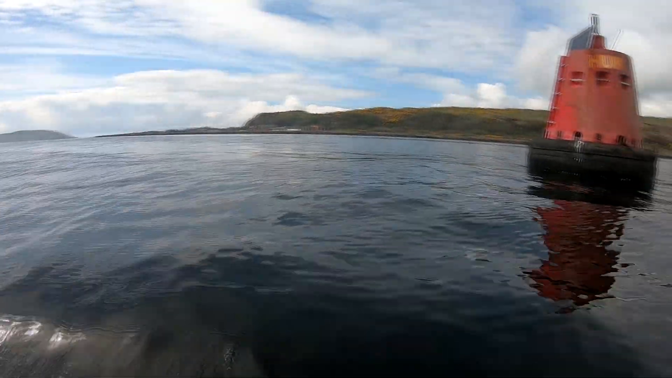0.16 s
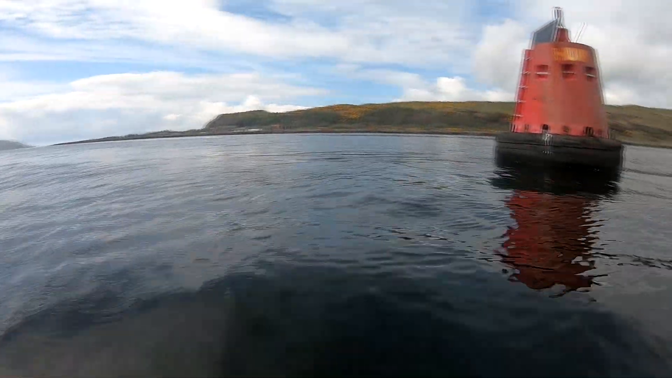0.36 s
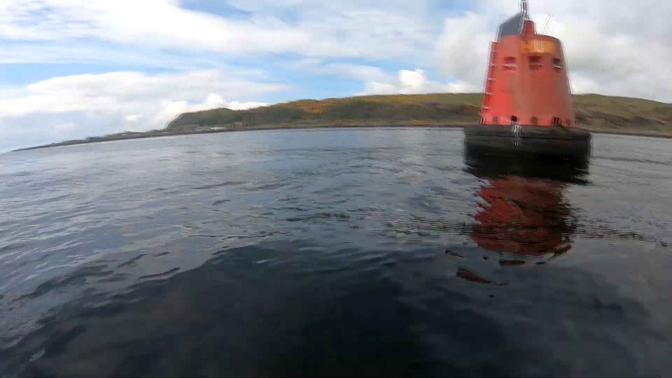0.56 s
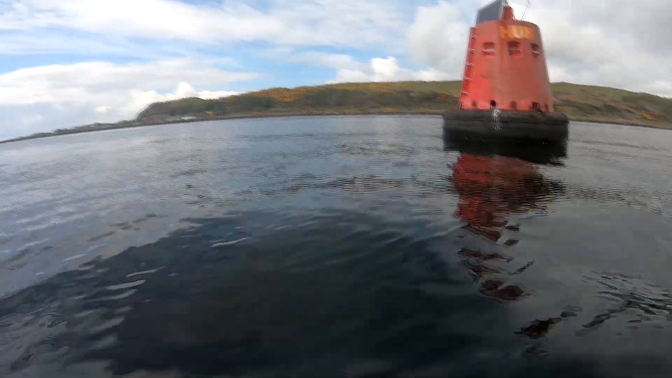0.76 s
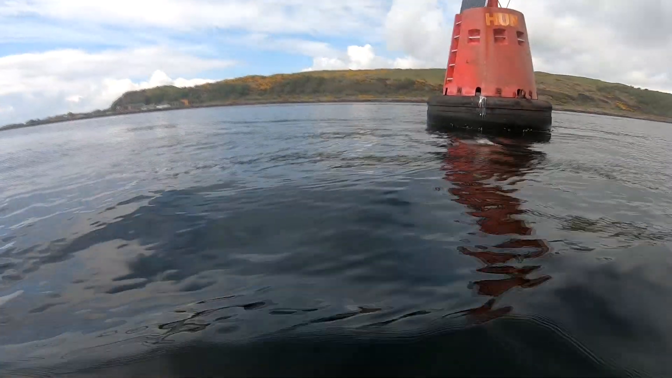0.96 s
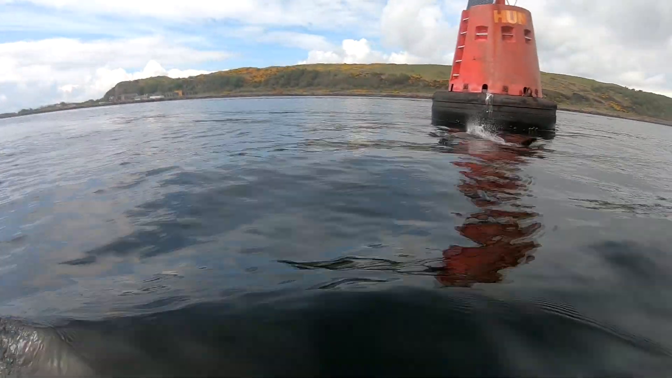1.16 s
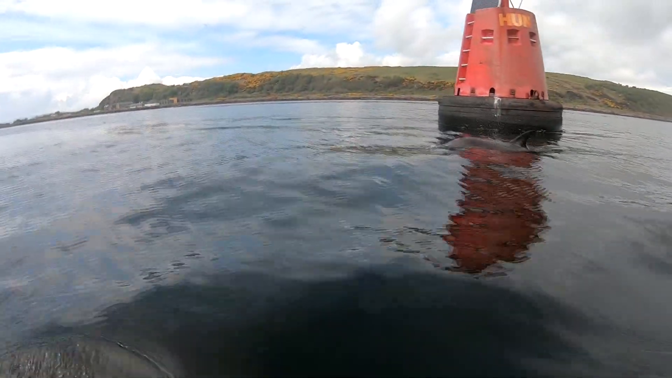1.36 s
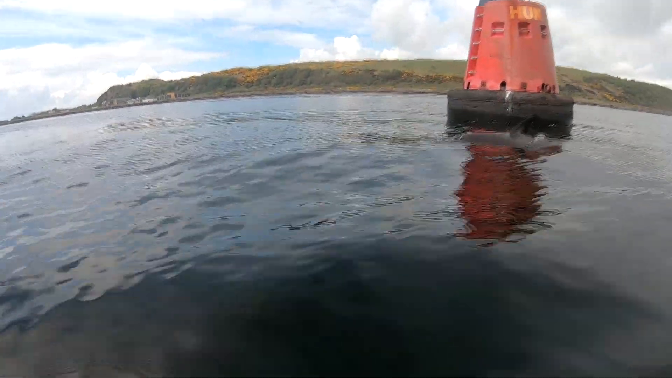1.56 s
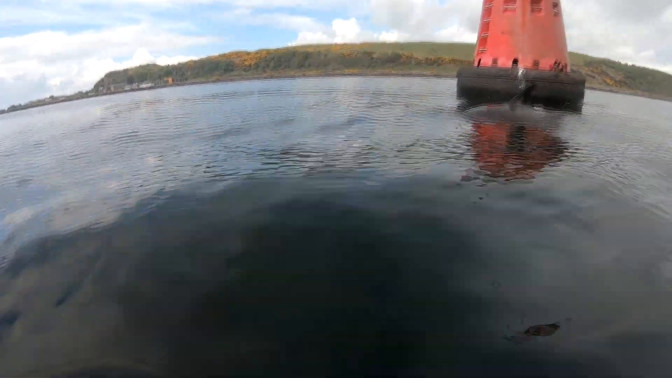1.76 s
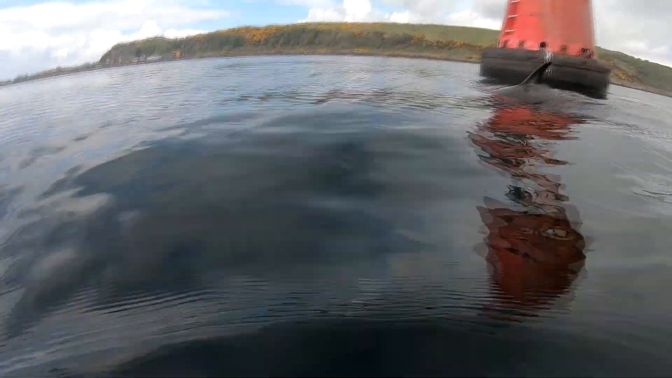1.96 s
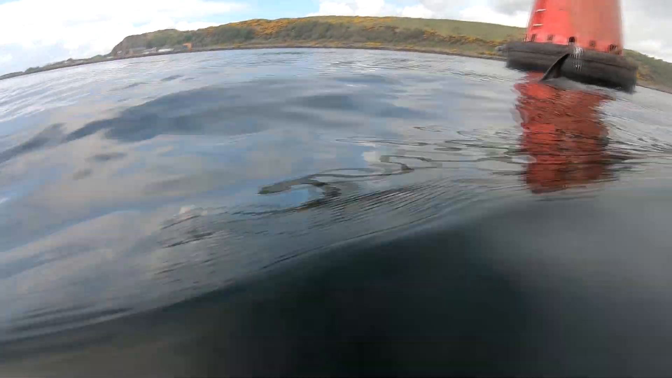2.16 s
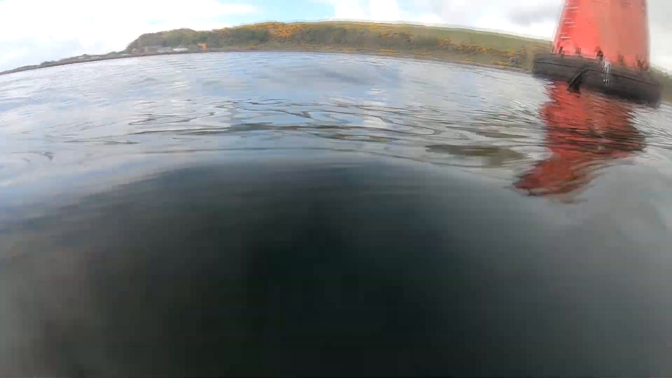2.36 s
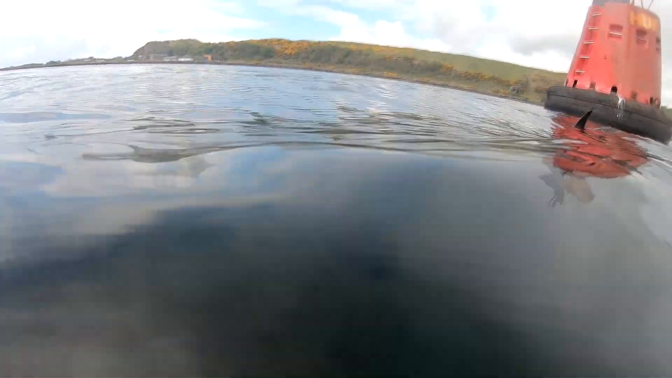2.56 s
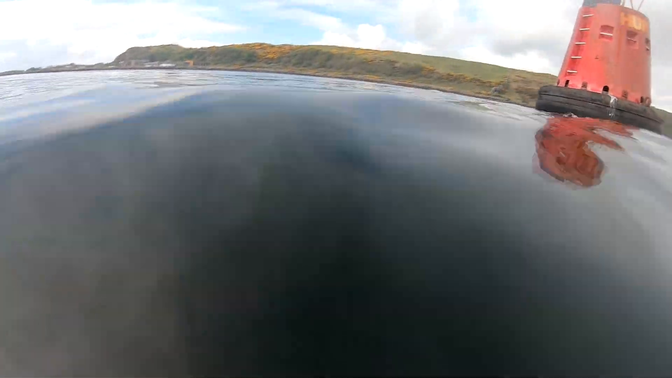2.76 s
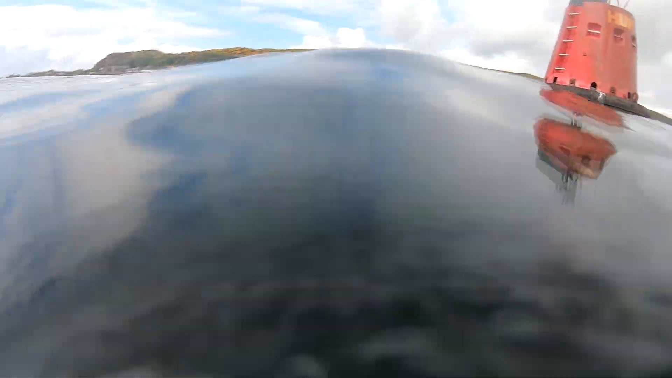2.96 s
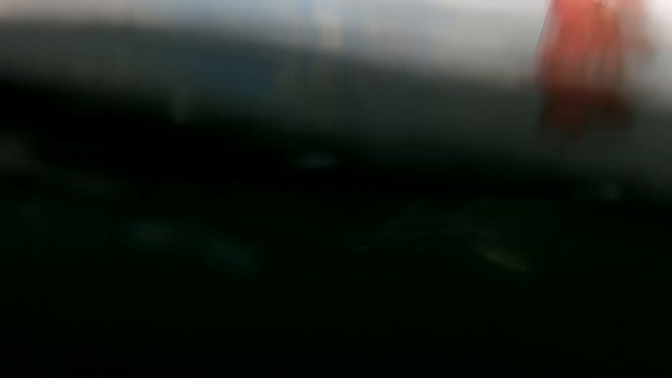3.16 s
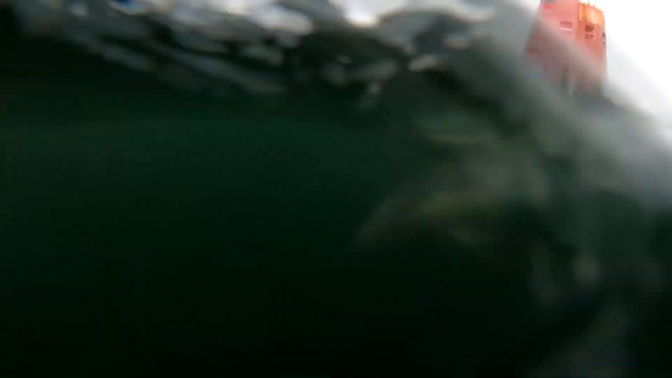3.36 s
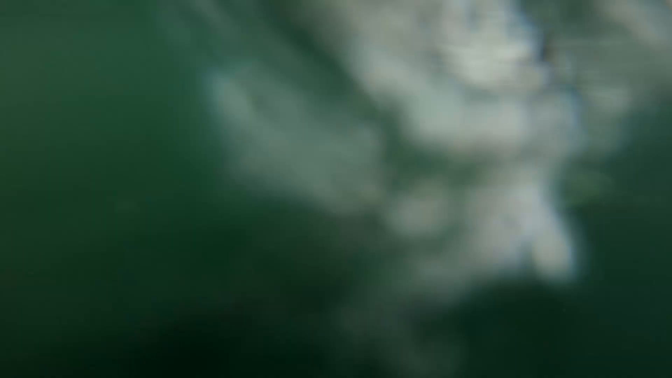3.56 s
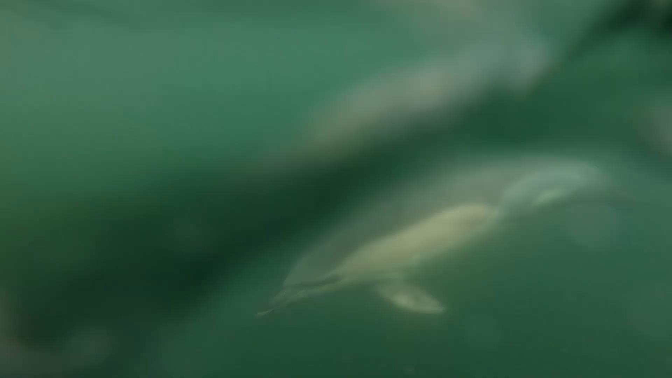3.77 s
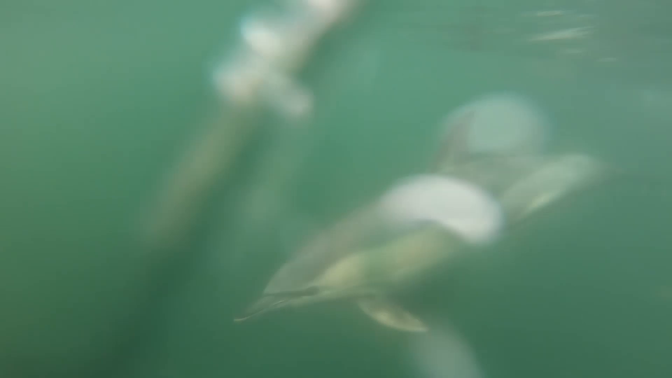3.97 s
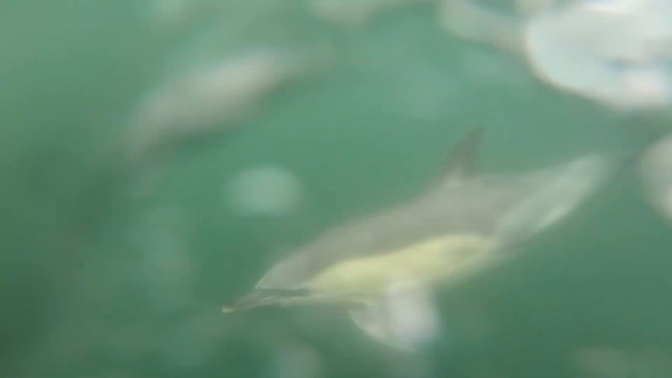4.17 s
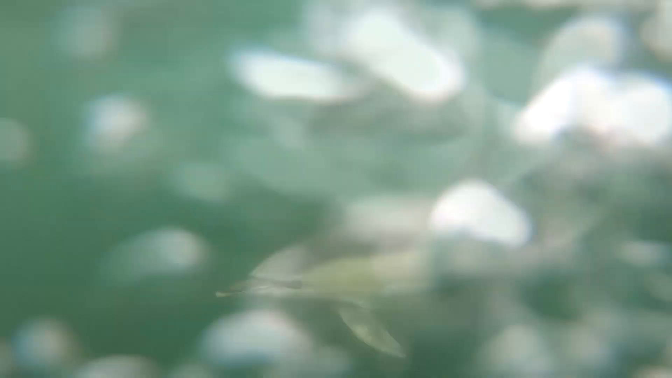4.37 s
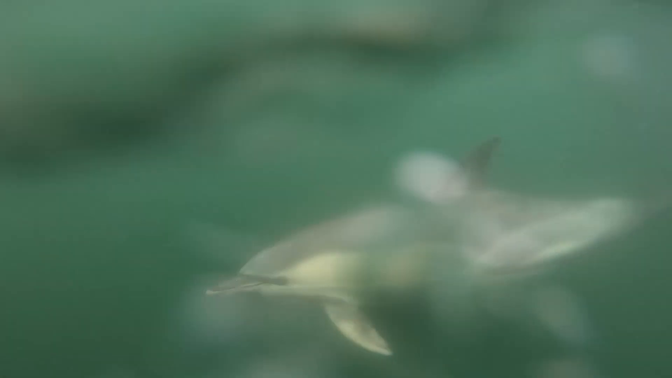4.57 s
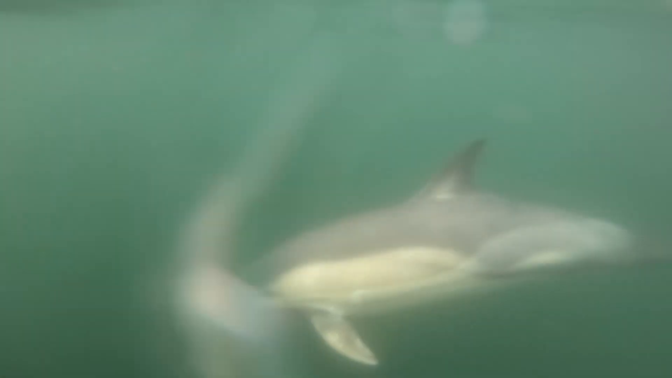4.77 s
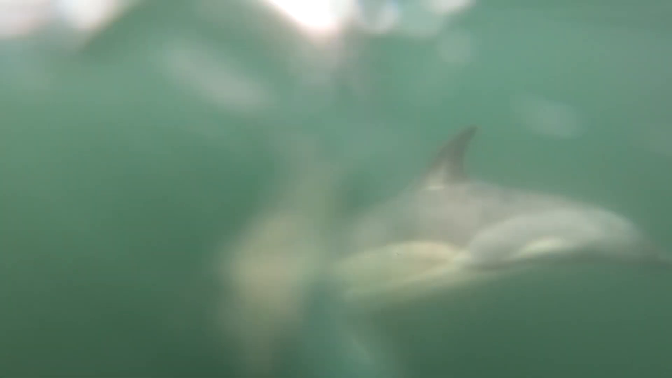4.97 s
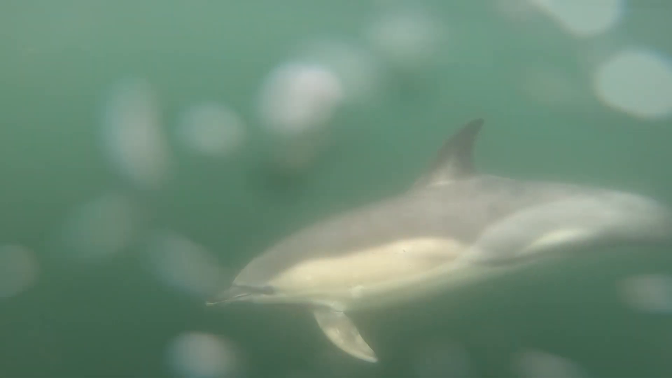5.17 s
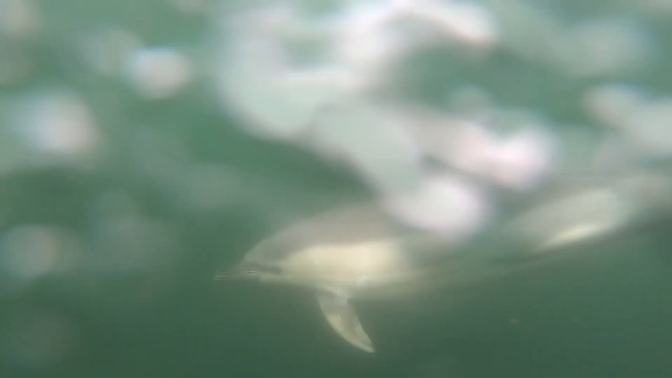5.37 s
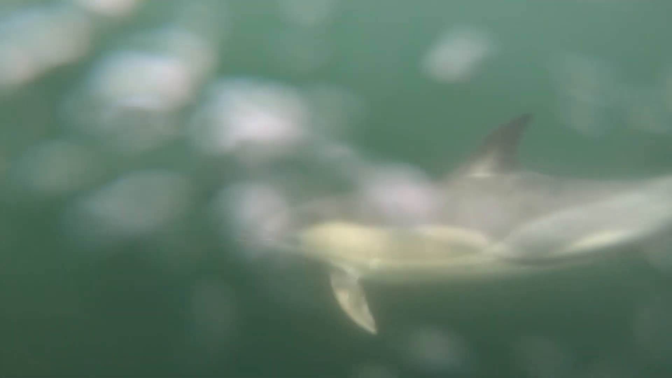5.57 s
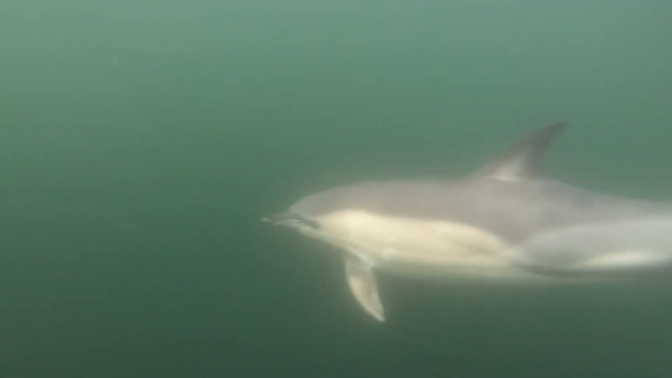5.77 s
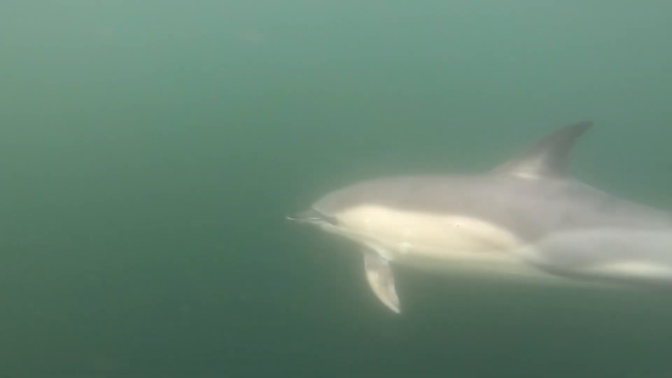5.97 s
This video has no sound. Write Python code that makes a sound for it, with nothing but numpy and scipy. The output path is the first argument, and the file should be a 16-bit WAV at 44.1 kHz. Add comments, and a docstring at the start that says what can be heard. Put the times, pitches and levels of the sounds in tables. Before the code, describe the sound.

A boat engine putters quietly over lapping wavelets, then a microphone plunges with a deep gulp into loud, muffled underwater gurgling and bubbling.

```python
"""Underwater gurgle: a ringing air pocket, bubble swarms, slaps and churning follow a camera on a pole into the sea.
The plunge gulps with decaying bubble and cavity tones; a spattering noise rush stops as the surface closes.
Before it, wavelets wash and plip in shaped noise and bubble tones, and the pole scuffs twice through resonances.
An idling boat engine (pulsed resonances and noise) and a light wind fade out at the plunge."""
import sys
import numpy as np
from scipy import signal
from scipy.fft import rfft, irfft
from scipy.io import wavfile
from scipy.ndimage import uniform_filter1d, minimum_filter1d

SR = 44100
rng = np.random.default_rng(int(sys.argv[2]) if len(sys.argv) > 2 else 0)


def master(y):
    """Save y as 16-bit WAV."""
    cut = np.clip(np.atleast_2d(y).T, -1, 1)
    pcm = np.round(cut * 32767)  # scale
    wavfile.write(sys.argv[1], SR, pcm.astype(np.int16))


N = 265482
TIME_S = np.arange(N) / SR
PLUNGE_S = 3.6
MUFFLE_HZ = 4784  # water on the microphone passes little above this


def amp(db):
    """Decibels to gain."""
    return 10 ** (np.asarray(db) / 20)


def unit(x):
    """Scales to an rms of one."""
    return x / np.sqrt(np.mean(x ** 2) + 1e-20)


def curves(rows):
    """Interpolates the columns of a table of times, sample by sample."""
    s, *columns = np.transpose(rows)
    return [np.interp(TIME_S, s, c) for c in columns]


def gain_at(spectrum, hz):
    """Reads a spectrum on a log-frequency axis."""
    f, db = np.transpose(spectrum)
    return amp(np.interp(np.log(hz + 1), np.log(f + 1), db))


def noise(spectrum):
    """Noise of the given colour, rms one."""
    gain = gain_at(spectrum, np.fft.rfftfreq(N, 1 / SR))
    return unit(irfft(rfft(rng.standard_normal(N)) * gain, N))


def drift(per_s):
    """Slow chance with about this many swings a second, rms one."""
    gain = np.exp(-(np.fft.rfftfreq(N, 1 / SR) / per_s) ** 2)
    return unit(irfft(rfft(rng.standard_normal(N)) * gain, N))


def fade_in(middle_s, length_s):
    """Ramps from 0 to 1, centred on middle_s."""
    return np.clip((TIME_S - middle_s) / length_s + .5, 0, 1)


def swells(rows, floor_db, taper):
    """A steady level plus soft-edged swells (start s, length s, dB); their powers add."""
    power = np.full(N, amp(floor_db) ** 2)
    for s, length_s, db in rows:
        edge = np.clip(np.minimum(TIME_S - s, s + length_s - TIME_S) / (taper * length_s), 0, 1)
        power += (amp(db) * np.sin(np.pi / 2 * edge)) ** 2
    return np.sqrt(power)


def lowpass(x, hz, order):
    """Butterworth low-pass."""
    return signal.sosfilt(signal.butter(order, min(hz, SR / 2 - 1), fs=SR, output="sos"), x)


def resonate(x, hz, width_hz):
    """A resonance of gain one, fixed or following a curve."""
    turn = np.exp(2j * np.pi * np.cumsum(hz * np.ones(len(x))) / SR)
    r = np.exp(-np.pi * width_hz / SR)
    # shift the pitch to zero, smooth, shift back; the offset avoids denormals
    return 2 * (turn * signal.lfilter([1 - r], [1, -r], x / turn + 1e-18)).real


def ring(x, modes):
    """Sends a force through a body's modes; a second, wider pass steepens their skirts."""
    return sum(amp(db) * resonate(resonate(x, hz, width_hz), hz, 4 * width_hz)
               for hz, width_hz, db in modes)


def add(mix, s, sound):
    """Mixes a sound in at the time s."""
    part = mix[max(round(s * SR), 0):][:len(sound)]
    part += sound[:len(part)]


def bubble(hz, t60_s, rise_octaves):
    """A bubble pinches off, rings down 60 dB in t60_s, and climbs in pitch as it nears the surface."""
    t = np.arange(int(1.3 * t60_s * SR) + 2) / SR
    pitch_hz = hz * 2 ** (rise_octaves * np.minimum(t / t60_s, 1))
    pinch = 1 - np.exp(-(hz * t) ** 2)
    decay = np.exp(-np.log(1000) * t / t60_s)
    return pinch * decay * np.sin(2 * np.pi * np.cumsum(pitch_hz) / SR)


def swarm(spectrum, per_s, cycles, spread_db, clump_db, clumps_per_s=25, climb_octaves=0.15, count=64):
    """Bubbles of many sizes, shed at random in clumps; each size has its own pitch, life and climb."""
    out = np.zeros(N)
    shedding = amp(clump_db * drift(clumps_per_s))
    chance = per_s / count / SR * shedding / shedding.mean()
    for hz in np.geomspace(spectrum[0][0], spectrum[-1][0], count):
        life, rise = rng.uniform(.4, 1.5), rng.uniform(0, climb_octaves)
        strength_db = spread_db * np.minimum(rng.exponential(1, N), 3.0)
        births = (rng.random(N) < chance) * amp(strength_db)
        tone = bubble(hz, life * cycles / hz, rise)
        out += gain_at(spectrum, hz) * signal.oaconvolve(births, tone)[:N]
    return unit(out)


def bursts(rows, width_share):
    """Many like-sized bubbles or drops go off together: a ragged burst that starts at once and fades."""
    out, t = np.zeros(N), np.arange(4096) / SR
    for s, length_s, hz, db in rows:
        ragged = rng.standard_normal(len(t)) * amp(4 * rng.standard_normal(len(t)))
        burst = ragged * np.exp(-(t / length_s) ** 2)
        for widening in (1, 2, 3):
            burst = resonate(burst, hz, widening * width_share * hz)
        add(out, s, amp(db) * unit(burst) * np.sqrt(length_s / t[-1]))
    return out


# Wind colour. Each row: frequency in Hz, relative density in dB per Hz.
WIND_COLOUR = [(10, 1.5), (30, -5.5), (90, -3.5), (200, -11.5), (400, -19.5), (1000, -53)]
# Gusts. Each row: start in seconds, length in seconds, relative level in dB.
WIND_GUSTS = [(-.2, 0.48, -48.5), (.6, 1.17, -44.5), (1.98, 0.465, -41.5), (3.15, 6.7, -33.5)]
BREEZE_REL_DB = -48.5  # between gusts


def wind():
    """A light breeze rumbles at the microphone: low noise, fluttering and swelling in gusts."""
    rumble = lowpass(noise(WIND_COLOUR), 7600, order=2)
    fluttering = unit(rumble * amp(2.7 * drift(38)))
    return amp(11.0) * swells(WIND_GUSTS, BREEZE_REL_DB, taper=0.13) * fluttering


# Cooling-water spurts, repeating every two firings. Each row: place in firings, relative level in dB.
WATER_SPURTS = [(.16, 0.5), (.53, 6), (.72, -21), (.93, 3), (1.62, 2.5), (1.9, -1.5)]
SPURT_S, DRIBBLE_REL_DB = 0.0066, -25  # spurt length, flow between spurts
HISS_DB, HISS_PEAK_S, HISS_SLOPE_DB_PER_S = -41, .42, 11  # swells to the peak, then dies away
HISS_HZ, HISS_EXTRA_HZ, HISS_SETTLE_S = 2500, 395, 0.1  # colour starts higher and settles


def cooling_water(firings, width_hz=760):
    """Short spurts of spray, resonant noise, putter out with the exhaust."""
    hz = HISS_HZ + HISS_EXTRA_HZ * np.exp(-TIME_S / HISS_SETTLE_S)
    spurts = amp(DRIBBLE_REL_DB)
    for place, db in WATER_SPURTS:
        away_s = ((firings - place + 1) % 2 - 1) / IDLE_HZ
        spurts = spurts + amp(db) * np.exp(-(away_s / SPURT_S) ** 2)
    spray = rng.standard_normal(N) * spurts
    for _ in range(4):
        spray = resonate(spray, hz, 2 * width_hz)
    return amp(HISS_DB - HISS_SLOPE_DB_PER_S * abs(TIME_S - HISS_PEAK_S)) * unit(spray)


# Engine clatter colour. Each row: frequency in Hz, relative density in dB per Hz.
CLATTER_COLOUR = [(100, -11), (190, -1), (300, -2.5), (420, -7), (600, -0.5), (750, -10), (1300, -9),
                  (1900, -11.5), (2900, -14.5), (4700, -23.5), (5700, -41), (8200, -34), (11000, -49),
                  (15000, -65)]
# Modes of engine block and cover. Each row: frequency in Hz, width in Hz, relative gain in dB.
BLOCK_MODES = [(519, 35, 10), (1067, 38, 3.5), (1405, 110, 2.5), (2460, 51, -1), (3320, 56, -30)]
# Exhaust boom, rising and falling as the boat rolls. Each row: time in seconds, level in dB before a 1.5 dB lift.
EXHAUST_LEVEL = [(0, -33), (.4, -38), (.7, -30), (1.0, -33.5), (2.1, -35), (2.85, -39.5), (3.33, -29.5)]
IDLE_HZ = 21.94  # firings per second
RATTLE_START_DB, BLOCK_START_DB = -37, -40.5
SHADE_DB, SHADE_POWER = -11.5, 2.05  # clatter is shaded more and more as the camera nears the water


def engine(thump_hz=136, thump_width_hz=30, fire_at=0.379, knock_at=0.504, knock_s=0.0034, weak_knock=0.3):
    """Each firing thumps the exhaust, spits water and rattles the block; every second one knocks harder."""
    shade_db = SHADE_DB * np.minimum(TIME_S / PLUNGE_S, 1) ** SHADE_POWER
    firings = IDLE_HZ * TIME_S
    puffs = np.diff(np.floor(firings - fire_at), prepend=-1) * amp(1.2 * drift(15))
    thump = resonate(puffs, thump_hz, thump_width_hz)
    exhaust = unit(resonate(thump, thump_hz, 3 * thump_width_hz))
    since_s = (firings - knock_at) % 1 / IDLE_HZ
    cylinder = np.where(np.floor(firings - knock_at) % 2, weak_knock, 1)
    knocks = uniform_filter1d(cylinder * np.exp(-since_s / knock_s), size=220)
    rattle = unit(noise(CLATTER_COLOUR) * (1 + 3.5 * knocks))
    block = unit(ring(rng.standard_normal(N) * (1 + 5 * knocks), BLOCK_MODES))
    clatter = amp(shade_db) * (amp(RATTLE_START_DB) * rattle + amp(BLOCK_START_DB) * block)
    return amp(curves(EXHAUST_LEVEL)[0] + 1.5) * exhaust + clatter + cooling_water(firings)


# Camera housing modes. Each row: frequency in Hz, width in Hz, relative gain in dB.
HOUSING_MODES = [(1380, 200, 11), (2000, 250, -5), (2420, 250, -3), (3400, 300, -12), (4150, 200, 0),
                 (8100, 400, -19)]
# Squeal modes of the slipping pole. Each row: frequency in Hz, width in Hz, relative gain in dB.
SQUEAL_MODES = [(1640, 81, -4), (2290, 98, 0.5), (2710, 110, -5), (4090, 84, -2.5), (4400, 89, -27),
                (7950, 240, -26.5)]
# Pole slips and catches. Each row: catch in seconds, build-up in seconds, rub in dB, knock in dB before a
# 1 dB cut, rub after the catch in dB, its length in seconds, pole thump in dB; all levels relative.
POLE_SCUFFS = [(2.37, 0.018, -13, -3.5, -15.5, 0.0084, -18), (2.4, 0.0033, -49, -37, -41, 0.0042, -27),
               (2.675, 0.036, -34, -9, -30, 0.109, -22.5)]
CRACK_HZ, CRACK_REL_DB = 1990, -6  # dry crack of the catch
POLE_HZ, POLE_T60_S = 125.3, 0.15  # bending note of the pole


def scuffs():
    """Friction builds up, catches with a knock and dies away, ringing in the housing and shaking the pole."""
    out = np.zeros(N)
    for s, build_s, rub_db, knock_db, after_db, after_s, thump_db in POLE_SCUFFS:
        grit = rng.standard_normal(N) * amp(2.0 * drift(86))
        caught = fade_in(s + 0.00075, 0.0026)
        build = np.exp(-2.5 * abs(TIME_S - s) / build_s) * (1 - caught)
        slip = amp(rub_db) * unit(ring(grit, SQUEAL_MODES)) * build
        # slow drag after the catch, duller than the slip
        drag = unit(lowpass(ring(grit, HOUSING_MODES), 8400, order=1))
        drag = amp(after_db) * drag * caught * (1 - fade_in(s + after_s, 0.017))
        blow = np.pad(np.hanning(9), (0, 4096))
        crack = resonate(resonate(blow, CRACK_HZ, 1600), CRACK_HZ, 3000)
        knock = ring(blow, HOUSING_MODES) + amp(CRACK_REL_DB) * crack
        add(out, s, amp(knock_db - 1.0) * knock / abs(knock).max())
        add(out, s + 0.0042, amp(thump_db) * bubble(POLE_HZ, POLE_T60_S, 0))
        out += slip + drag
    return lowpass(out, 14000, order=2)


# Small waves on hull and housing. Each row: start in seconds, length in seconds, peak gain in dB.
WAVE_LAPS = [(1.103, 0.26, -28.5), (1.283, 0.49, -35.5), (2.666, 0.46, -40.5), (2.894, 0.18, -38.5),
             (2.986, 0.16, -36), (3.055, 0.24, -33), (3.137, 0.58, -41.5), (3.26, 0.068, -43.5),
             (3.442, 0.081, -38.5)]
# Wash colour. Each row: frequency in Hz, relative density in dB per Hz.
SPRAY_COLOUR = [(200, 7), (600, 14), (1000, 5.5), (1400, 8.5), (4300, -4.5), (6000, -13), (8500, -15.5),
                (10300, -26), (11500, -40), (15000, -61)]
# Droplet sizes. Each row: frequency in Hz, relative drop level in dB.
DROPLET_SIZES = [(1700, -6), (2200, 4), (4800, 5), (6200, -5), (8300, 10.5), (10500, -13), (12000, -23.5)]
# Water sheets on the housing. Each row: start in seconds, length in seconds, centre in Hz, relative level in dB.
SHEET_SPATTERS = [(2.663, 0.0069, 4150, -37), (2.938, 0.006, 4270, -46), (2.967, 0.017, 9050, -52),
                  (2.972, 0.029, 4330, -35), (3.074, 0.014, 8200, -44.5), (3.106, 0.007, 4540, -37.5),
                  (3.145, 0.022, 3070, -35), (3.176, 0.0038, 4150, -35), (3.213, 0.0043, 6360, -58),
                  (3.266, 0.0041, 7560, -46), (3.291, 0.018, 9500, -54.5), (3.292, 0.02, 5450, -48),
                  (3.464, 0.002, 5740, -46), (3.469, 0.002, 7660, -40), (3.493, 0.0037, 6500, -47),
                  (3.503, 0.0081, 5100, -41.5), (3.504, 0.012, 7700, -45), (3.516, 0.0086, 3170, -33),
                  (3.557, 0.0068, 3870, -43)]
SPATTER_WIDTH_SHARE = 0.15  # bandwidth / centre
SURFACE_S, FAR_LAP_HZ = 2.6, 3940  # until the camera nears the surface, waves are far off and dull


def laps():
    """Wavelets break into a short wash; close ones are bright and scatter droplets, and sheets spatter."""
    swell = np.zeros(N)
    for s, length_s, db in WAVE_LAPS:
        add(swell, s, amp(db) * np.hanning(int(length_s * SR)))
    droplets = swarm(DROPLET_SIZES, per_s=1100, cycles=55, spread_db=2.0, clump_db=3.5, count=36)
    wash = unit(noise(SPRAY_COLOUR) * amp(3.34 * drift(180)))
    near = fade_in(SURFACE_S, .3)
    close_wash = near * (wash + amp(-15) * droplets)
    far_wash = (1 - near) * lowpass(wash, FAR_LAP_HZ, order=1)
    return swell * (close_wash + far_wash) + bursts(SHEET_SPATTERS, SPATTER_WIDTH_SHARE)


# Cavities shrinking against the housing. Each row: start in seconds, length in seconds, first pitch in Hz,
# last pitch in Hz, starting level in dB before the flutter.
CAVITY_SQUEEZES = [(3.141, 0.044, 725, 3290, -23.5), (3.142, 0.013, 1250, 1430, -18.5),
                   (3.477, 0.016, 1117, 1330, -20), (4.235, 0.05, 778, 1250, -28.5),
                   (4.406, 0.037, 683, 820, -23.5), (4.718, 0.025, 1160, 1000, -29.5),
                   (4.746, 0.03, 860, 960, -26.5), (4.96, 0.015, 1340, 1450, -23),
                   (4.98, 0.034, 722, 794, -19.5), (5.04, 0.042, 1288, 1460, -21),
                   (5.656, 0.1, 775, 827, -25)]


def squeezes():
    """A closing cavity's note sweeps, mostly upward, ever faster, and flutters as it weakens."""
    out = np.zeros(N)
    for s, length_s, first_hz, last_hz, db in CAVITY_SQUEEZES:
        closed = np.linspace(0, 1, int(length_s * SR))
        hz = first_hz * (last_hz / first_hz) ** (closed ** 1.3)
        envelope = amp(db - 8.3 * closed) * signal.windows.tukey(len(hz), .2)
        add(out, s, envelope * np.sin(2 * np.pi * np.cumsum(hz) / SR))
    return out * amp(2.0 * drift(300))


# Rush colour. Each row: frequency in Hz, relative density in dB per Hz.
RUSH_COLOUR = [(500, -17), (1100, 11.5), (1600, 4), (2200, 4), (2900, 5), (3500, -19), (4400, -14),
               (5600, -33), (8000, -34), (13000, -45)]
CLOSING_S, CLOSING_BUILD_S, CLOSING_REL_DB = 3.578, 0.022, -23.5


def closing():
    """A spattering rush swells as the sea climbs the housing, and stops as it closes over."""
    swell = np.exp(-abs(TIME_S - CLOSING_S) / CLOSING_BUILD_S) * (1 - fade_in(CLOSING_S + 0.002, 0.0088))
    return amp(CLOSING_REL_DB) * swell * unit(noise(RUSH_COLOUR) * amp(4.3 * drift(250)))


# Single bubbles at the hull or near the housing. Each row: start in seconds, pitch in Hz, level in dB.
SINGLE_BUBBLES = [(0.17, 300, -25.5), (0.21, 255, -28), (0.775, 300, -29), (0.865, 365, -28.5),
                  (2.07, 264, -26.5), (2.973, 4400, -19), (3.032, 8100, -21), (3.08, 492, -13.5),
                  (3.162, 4400, -22.5), (3.48, 4040, -22), (3.493, 8600, -29.5), (3.497, 2200, -18),
                  (3.517, 1390, -21), (3.542, 1930, -18), (3.561, 1074, -17.5), (3.575, 1120, -13.5),
                  (3.576, 1740, -12), (3.579, 324, -1), (3.603, 306.4, 2.5), (3.686, 1350, -28),
                  (3.687, 384, -11.5), (3.798, 325.5, -12), (3.866, 650, -18), (3.885, 302, -1),
                  (3.999, 269, -6), (4.067, 2800, -27), (4.168, 2310, -28), (4.243, 844, -23.5),
                  (4.19, 2820, -29), (4.349, 1284, -21.5), (4.395, 2370, -29), (4.462, 717, -14),
                  (4.609, 927, -17), (4.69, 714, -17.5), (4.901, 1746, -16), (4.971, 725, -13.5),
                  (4.977, 924, -14), (5.046, 1344, -17), (5.11, 2700, -23), (5.21, 853, -14),
                  (5.307, 904, -12), (5.352, 780, -13.5), (5.288, 1220, -15.5), (5.312, 1270, -19),
                  (5.392, 1126, -12), (5.41, 1320, -16), (5.428, 858, -10), (5.655, 940, -14.5),
                  (5.744, 1870, -18), (5.788, 1440, -16.5), (5.807, 497, -10), (5.877, 364, -8.5),
                  (5.931, 2730, -25), (5.964, 403, -13), (5.976, 1134, -16)]
# Collapsing cavities. Each row: start in seconds, pitch in Hz, level in dB before damping.
CAVITY_GLUGS = [(3.589, 225, 14), (3.599, 670, 3.5), (3.607, 155.6, 10), (3.701, 188, 8.5),
                (3.727, 196, 14.5), (3.735, 215, 12), (3.77, 277, 7.5), (4.007, 109, 7.5), (4.274, 231, 9),
                (4.694, 267, 2.5), (5.098, 195, 8.5), (5.745, 343, 9.5)]
BUBBLE_T60_CYCLES, BUBBLE_RISE_OCTAVES = 42.2, .18
GLUG_T60_CYCLES, GLUG_RISE_OCTAVES = 5.5, 0.079  # damped within a few cycles


def near_bubbles():
    """Gulps at the hull, surface plips, the plunge gulp, then muffled bubbles and cavities by the housing."""
    out, under = np.zeros(N), fade_in(PLUNGE_S, 0.044)
    for s, hz, db in SINGLE_BUBBLES:
        add(out, s, amp(db) * bubble(hz, BUBBLE_T60_CYCLES / hz, BUBBLE_RISE_OCTAVES))
    for s, hz, db in CAVITY_GLUGS:
        add(out, s, amp(db) * bubble(hz, GLUG_T60_CYCLES / hz, GLUG_RISE_OCTAVES))
    return (1 - under) * out + under * lowpass(out, MUFFLE_HZ, order=8)


# Churn colour with large air gulps. Each row: frequency in Hz, relative density in dB per Hz.
CHURN_COLOUR = [(10, -1), (30, 3), (110, 1.5), (240, 1.5), (340, -18), (600, -18.5), (1500, -79)]
# Wake colour once they have gone. Each row: frequency in Hz, relative density in dB per Hz.
WAKE_COLOUR = [(10, -8), (30, 5), (90, 5.5), (170, -8), (260, -6), (600, -25), (1500, -51)]
# Large eddies swelling the churn. Each row: start in seconds, length in seconds, relative level in dB.
LARGE_EDDIES = [(3.94, 0.079, -15.5), (4.76, 0.16, -15.5)]
CHURN_REL_DB, WAKE_REL_DB, CALM_S = -19.5, -22, 5.19


def churning():
    """Water tumbles round the housing, swells with each large eddy and calms into a wake."""
    calm = fade_in(CALM_S, 0.16)
    tumble = swells(LARGE_EDDIES, CHURN_REL_DB, taper=0.33) * noise(CHURN_COLOUR)
    wake = amp(WAKE_REL_DB) * noise(WAKE_COLOUR)
    return ((1 - calm) * tumble + calm * wake) * unit(amp(2.5 * drift(30)))


# Air slugs and the surface slapping the housing. Each row: start in seconds, peak of the blow in dB,
# pitch of the trapped air in Hz.
HOUSING_SLAPS = [(3.573, -15, 1100), (3.601, -18.5, 670), (3.704, -24, 600), (3.771, -25, 600),
                 (3.868, -21.5, 1300), (3.939, -25, 750), (4.281, -14.5, 570), (4.498, -19.5, 770),
                 (4.593, -20.5, 700), (4.826, -16, 1080), (5.165, -26, 620), (5.258, -12, 620),
                 (5.336, -13.5, 640), (5.386, -16, 1350), (5.443, -21.5, 1050), (5.469, -21, 780),
                 (5.501, -19, 700), (5.548, -15, 620), (5.742, -14, 650), (5.789, -17, 1000),
                 (5.807, -11, 650), (5.878, -13, 620)]
# Housing modes damped by water. Each row: frequency in Hz, width in Hz, relative gain in dB.
WET_HOUSING_MODES = [(630, 570, 25), (1300, 220, 3.5), (3100, 980, -13)]
SLAP_S, SLAP_DULL_HZ = 0.0016, 2230  # water takes this long to flatten on the housing; blow softened
PLOP_T60_CYCLES, PLOP_REL_DB = 12, 5  # trapped air, against the blow


def slaps():
    """Each slap is a brief ragged push on the wet housing, with the plop of the air it traps."""
    out, t = np.zeros(N), np.arange(2048) / SR
    for s, db, hz in HOUSING_SLAPS:
        push = rng.standard_normal(len(t)) * np.exp(-t / SLAP_S)
        knock = lowpass(ring(push, WET_HOUSING_MODES), SLAP_DULL_HZ, order=2)
        add(out, s, amp(db) * knock / abs(knock).max())
        add(out, s, amp(db + PLOP_REL_DB) * bubble(hz, PLOP_T60_CYCLES / hz, GLUG_RISE_OCTAVES))
    return out


# Air pocket trailing behind the pole. Each row: time in seconds, pitch in Hz before wavering, share of its
# air still in one piece (0-1), relative level in dB.
POCKET_COURSE = [(3.75, 328, 0.61, -12), (4.0, 289, 0.2, -14.5), (4.2, 438, 0.65, -17),
                 (4.32, 375.3, 1, -14), (4.42, 415.7, 0.63, -11), (4.8, 438.3, 0.84, -15.5),
                 (5.15, 443, 0.56, -9.5), (5.52, 445.7, 1, -9.5), (5.66, 479.5, 0.76, -14),
                 (5.77, 450, 0, -13)]
# Large bubbles torn off the pocket. Each row: frequency in Hz, relative bubble level in dB.
FRAGMENT_SIZES = [(270, -7.5), (350, 3.5), (450, 8), (540, -0.5), (640, -9)]
# Kicks as a piece tears off. Each row: start in seconds, relative level in dB.
POCKET_KICKS = [(4.319, -4), (4.365, -3), (4.392, -3.5), (4.57, -10.5), (4.624, -12), (4.741, -7),
                (4.807, -9), (5.167, -8), (5.355, -8), (5.47, -5), (5.557, 1), (5.617, -6)]
KICK_T60_CYCLES, KICK_RISE_OCTAVES = 54, 0.19
OVERTONE_RATIO, OVERTONE_REL_DB = 1.76, -21.5  # the pocket is lopsided


def air_pocket(lull, width_hz=18, skirt_hz=200, trim_db=-5.0):
    """Eddies shake the trailing pocket and tear it into large bubbles; kicks ring at its current pitch."""
    hz, whole, db = curves(POCKET_COURSE)
    wavering_hz = hz * (1 + 0.038 * drift(22))
    whole = np.clip(whole, 0, 1)
    shake = rng.standard_normal(N) * amp(3.0 * drift(40))
    note, overtone = (unit(resonate(resonate(shake, f, width_hz), f, skirt_hz))
                      for f in (wavering_hz, OVERTONE_RATIO * wavering_hz))
    pocket = unit((note + amp(OVERTONE_REL_DB) * overtone) * amp(3.0 * drift(22)))
    fragments = swarm(FRAGMENT_SIZES, per_s=260, cycles=26, spread_db=2.5, clump_db=2.0,
                      climb_octaves=.35, count=24)
    out = amp(db + trim_db) * lull * (np.sqrt(whole) * pocket + np.sqrt(1 - whole) * fragments)
    for s, kick_db in POCKET_KICKS:
        now_hz = np.interp(s, TIME_S, hz)
        add(out, s, amp(kick_db) * bubble(now_hz, KICK_T60_CYCLES / now_hz, KICK_RISE_OCTAVES))
    return out


# Bubble clouds sweeping past. Each row: start in seconds, length in seconds, relative swarm level in dB,
# relative fizz level in dB.
BUBBLE_CLOUDS = [(3.826, 0.29, -33.5, -66), (4.039, 0.37, -34.5, -51), (4.479, 0.087, -29, -50),
                 (4.68, 0.26, -28, -57), (5.072, 0.17, -31.5, -47), (5.271, 0.28, -24, -45.5),
                 (5.501, 0.077, -27, -42.5), (5.58, 0.17, -26, -43), (5.75, 0.28, -26, -53.5)]
# Swarm sizes. Each row: frequency in Hz, relative bubble level in dB.
SWARM_SIZES = [(350, -20.5), (540, 4), (680, -3.5), (820, -3), (1000, -9.5), (1350, -2.5), (1850, -11),
               (2300, -31)]
# Fizz sizes. Each row: frequency in Hz, relative bubble level in dB.
FIZZ_SIZES = [(1800, 1), (2300, 7.5), (2900, 10.5), (3600, 1.5), (4400, 4.5), (5000, -23.5)]
# Level changes as bubbling thins between bursts. Each row: middle in seconds, length in seconds, gain in dB.
BUBBLE_LULLS = [(3.648, 0.046, -7), (3.748, 0.01, -3.5), (4.31, 0.037, -1), (4.527, 0.0094, -10),
                (4.946, 0.02, 1), (5.022, 0.019, 0), (5.502, 0.021, -7.5), (5.593, 0.043, -5.5),
                (5.752, 0.031, -3)]
# Colour of countless merged bubbles. Each row: frequency in Hz, relative density in dB per Hz.
SEETHE_COLOUR = [(400, -27), (800, 10), (1350, 1.5), (1900, -7.5), (2400, -16), (3600, -17.5), (4700, -26)]
# Thickest clouds, merged into a rush. Each row: start in seconds, length in seconds, relative level in dB.
SEETHE_SURGES = [(5.27, 0.079, -34), (5.34, 0.16, -30), (5.63, 0.087, -34), (5.78, 0.27, -36.5)]
# Knots of small bubbles bursting on the housing. Each row: start in seconds, length in seconds,
# centre in Hz, relative level in dB.
BUBBLE_CRACKLES = [(3.703, 0.0027, 4500, -47), (3.71, 0.0035, 3000, -47), (3.729, 0.012, 3400, -60),
                   (3.78, 0.0051, 3400, -44), (3.83, 0.008, 3400, -50), (3.907, 0.0054, 3600, -47),
                   (3.957, 0.0031, 3300, -53), (4.042, 0.0089, 3000, -40.5), (4.088, 0.015, 3400, -48),
                   (4.21, 0.0059, 3000, -46), (4.32, 0.0042, 3300, -48), (4.541, 0.004, 3500, -49.5),
                   (4.587, 0.0062, 2700, -43), (4.655, 0.0044, 3200, -46.5), (4.75, 0.011, 3400, -46),
                   (4.768, 0.007, 2700, -36.5), (4.824, 0.011, 2200, -39.5), (4.85, 0.0048, 3500, -48.5),
                   (4.898, 0.019, 2400, -38), (4.928, 0.012, 3600, -40.5), (4.959, 0.0048, 3000, -44.5),
                   (5.016, 0.0082, 3800, -43), (5.108, 0.031, 2700, -48), (5.145, 0.0073, 3000, -40),
                   (5.174, 0.0053, 2800, -40.5), (5.223, 0.0047, 3900, -44), (5.245, 0.0054, 3700, -44),
                   (5.346, 0.0089, 3500, -40), (5.388, 0.012, 2800, -38), (5.442, 0.012, 2900, -38),
                   (5.467, 0.005, 3300, -36), (5.667, 0.0062, 3300, -44), (5.806, 0.005, 3300, -36),
                   (5.938, 0.01, 3500, -46.5)]
# Colour of the tiniest bubbles. Each row: frequency in Hz, relative density in dB per Hz.
MIST_COLOUR = [(5000, -39), (6200, -8), (7000, 2), (8000, -8), (10000, -17.5), (12000, -39)]
# Puffs of them. Each row: start in seconds, length in seconds, relative level in dB.
MIST_PUFFS = [(4.935, 0.047, -65), (4.99, 0.034, -71), (5.135, 0.031, -69), (5.343, 0.014, -63),
              (5.36, 0.064, -73.5), (5.53, 0.03, -74.5)]
FLOW_S, HUSH_DB = 3.765, -10  # water is hushed until it starts to stream past
TRICKLE_REL_DB, FIZZ_FLOOR_REL_DB = -35, -56.5  # thin stream between clouds
SHATTER_REL_DB, SHATTER_FIZZ_REL_DB, SHATTER_S = -9, -44, 0.021  # bubbles shed by each slap
SLUG_S, SLUG_DB = 0.018, -3  # an air slug hushes the stream just before each slap
CRACKLE_WIDTH_SHARE = 0.34  # bandwidth / centre


def gurgle(cloud_taper=0.11):
    """The stream carries pocket, churn and seething bubble clouds; water on the microphone dulls them."""
    flow = amp(HUSH_DB * (1 - fade_in(FLOW_S, 0.013))) * fade_in(PLUNGE_S, 0.029)
    lull_db = sum(db * np.exp(-(2 * (TIME_S - s) / length_s) ** 2) for s, length_s, db in BUBBLE_LULLS)
    slug_db = sum(SLUG_DB * np.exp(-(2 * (TIME_S - s) / SLUG_S + 1) ** 2) for s, _, _ in HOUSING_SLAPS)
    lull = amp(lull_db) * amp(slug_db)
    shatter = sum(amp(db) * (TIME_S > s) * np.exp(-abs(TIME_S - s) / SHATTER_S)
                  for s, db, _ in HOUSING_SLAPS)
    swarm_rows = [(s, length_s, db) for s, length_s, db, _ in BUBBLE_CLOUDS]
    fizz_rows = [(s, length_s, db) for s, length_s, _, db in BUBBLE_CLOUDS]
    cloud = flow * lull * swells(swarm_rows, TRICKLE_REL_DB, cloud_taper)
    fizz = flow * lull * swells(fizz_rows, FIZZ_FLOOR_REL_DB, cloud_taper)
    cloud = np.hypot(cloud, amp(SHATTER_REL_DB) * shatter)
    fizz = np.hypot(fizz, amp(SHATTER_FIZZ_REL_DB) * shatter)
    middle = swarm(SWARM_SIZES, per_s=600, cycles=46, spread_db=2.8, clump_db=3.6,
                   clumps_per_s=45, climb_octaves=.35)
    fine = swarm(FIZZ_SIZES, per_s=1100, cycles=50, spread_db=3.6, clump_db=6.0,
                 clumps_per_s=60, climb_octaves=.08)
    seethe = unit(noise(SEETHE_COLOUR) * amp(3.5 * drift(90)))
    rush = lull * swells(SEETHE_SURGES, -52, taper=0.29) * seethe
    bubbles = amp(0.5) * cloud * middle + rush + amp(-2.0) * fizz * fine
    stream = flow * (air_pocket(lull) + lull * churning())
    water = stream + bubbles + slaps() + bursts(BUBBLE_CRACKLES, CRACKLE_WIDTH_SHARE)
    # the tiniest bubbles burst right on the microphone and escape the muffling
    mist = swells(MIST_PUFFS, -94, taper=0.4) * unit(noise(MIST_COLOUR) * amp(5 * drift(200)))
    return lowpass(water, MUFFLE_HZ, order=10) + flow * mist


def scene():
    """Sounds of the air end at the plunge, where the gurgle begins."""
    above = 1 - fade_in(PLUNGE_S, 0.024)
    air = above * (wind() + engine())
    surface = scuffs() + laps() + squeezes() + closing()
    return (air + surface + near_bubbles() + gurgle())[None]


RUMBLE_CUT_HZ, EDGE_HZ = 4.4, 15700  # the microphone passes nothing much deeper; upper band limit


def record(dry):
    """Cuts the deepest rumble, limits the loudest gulps under full scale, then limits the band."""
    dry = dry - lowpass(dry, RUMBLE_CUT_HZ, order=1)
    room = np.minimum(1, .95 / (abs(dry) + 1e-9))
    limited = dry * uniform_filter1d(minimum_filter1d(room, size=301), size=301)
    limited = limited * signal.windows.tukey(N, .002)  # soft ends
    return signal.sosfiltfilt(signal.butter(12, EDGE_HZ, fs=SR, output="sos"), limited)


dry = scene()
out = record(dry)
master(out)
```